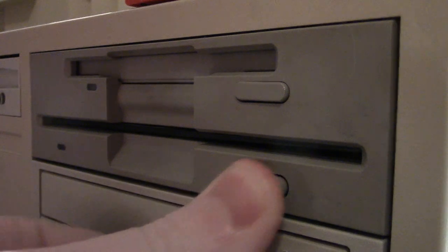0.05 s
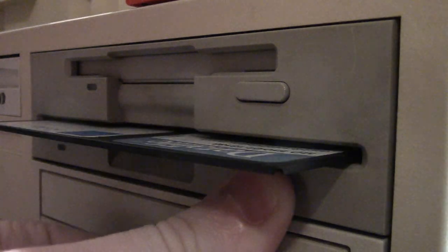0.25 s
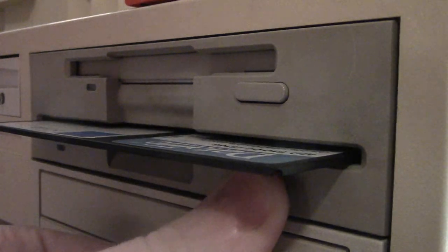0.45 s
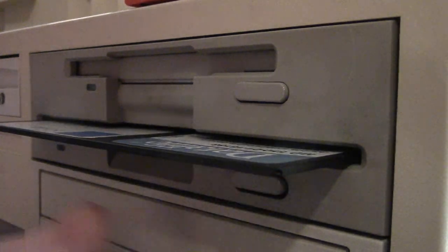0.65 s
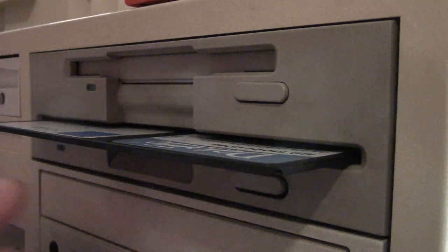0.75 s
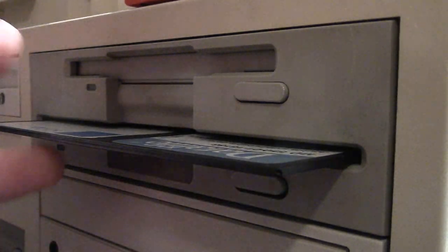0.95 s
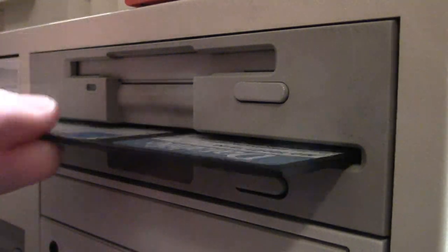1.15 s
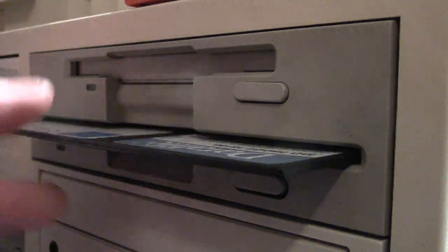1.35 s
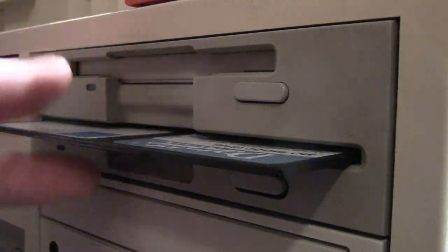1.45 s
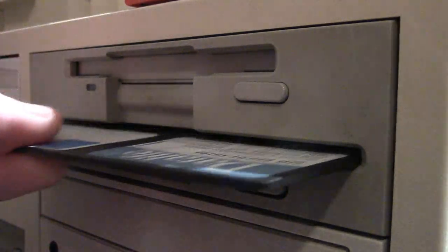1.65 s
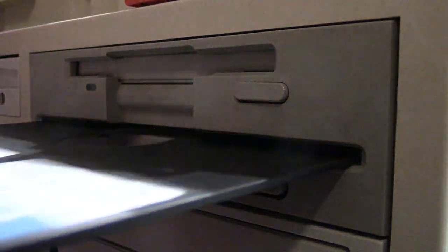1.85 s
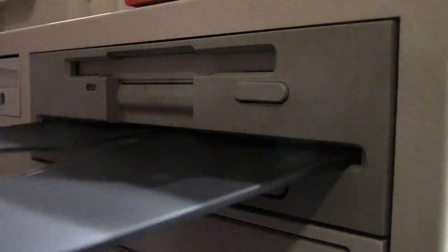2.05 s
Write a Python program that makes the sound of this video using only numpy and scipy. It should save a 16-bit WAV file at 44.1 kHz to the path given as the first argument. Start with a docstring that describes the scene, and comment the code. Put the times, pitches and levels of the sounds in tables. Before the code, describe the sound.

A disk ejects from a computer drive with a sharp double clack, then scrapes out over fan hum

```python
"""A floppy disk is ejected from the drive of a running computer, heard in stereo from close by.
After light plastic ticks the latch lets go with a double clack: noise bursts that ring frame and case.
The spring shimmers as a bank of decaying modes, and the button snaps back with its own ring.
Fingers rub, tick and bump as they take hold; the disk scrapes out along the slot as grainy noise.
Fans run throughout: coloured air noise, wavering tones and a faint diffuse room."""
import sys
import numpy as np
from scipy import signal
from scipy.fft import rfft, irfft
from scipy.io import wavfile
from scipy.ndimage import uniform_filter1d, minimum_filter1d

SR = 44100
rng = np.random.default_rng(int(sys.argv[2]) if len(sys.argv) > 2 else 0)


def transcribe(signal):
    """Save signal, clipped to [-1, 1], as a 16-bit WAV file at the path in sys.argv[1]."""
    frames = np.atleast_2d(signal).T
    limited = np.clip(frames, -1, 1)
    pcm = np.round(limited * 32767).astype(np.int16)
    wavfile.write(sys.argv[1], SR, pcm)


N = 92610
TIME = np.arange(N) / SR

# hard stops that set frame and spring ringing: start_s, level_db
STOPS = [(0.2362, -12), (0.2560, -2.5)]
# ringing of the drive frame: pitch_hz, level_db (added to that of the blow), t60_s
FRAME_MODES = [(533, -23, 0.12), (669, -34, .35), (910, -26, .07), (1513, -30, 0.17), (1840, -29, 0.18),
               (1930, -16, 0.087), (2680, -25, .14), (2954, -20, .08), (3120, -13, 0.063),
               (3155, -13.5, 0.083), (3650, -20.5, 0.056), (3865, -21.5, 0.08)]
# ringing of the case: pitch_hz, level_db (added to that of the blow), t60_s
CASE_MODES = [(188, -26, .22), (243.7, -24, .22), (295, -27, 0.16), (350, -31, .17), (430, -29, .16),
              (883, -29, .2), (955, -30, .27)]
# spectrum of plastic scraping or rubbed by fingers: frequency_hz, relative level_db_per_hz
SCRAPE_SPECTRUM = [(880, -42), (1500, -11.5), (1880, -4.5), (2050, -14), (2240, -6), (2590, -5),
                   (3480, -1.5), (4270, -2), (4940, -1.5), (5720, -9), (7450, -3.5), (10500, -7),
                   (15500, -22.5)]


def from_db(db):
    """Decibels to gain."""
    return 10 ** (np.asarray(db) / 20)


def rms_one(x):
    """Scale to unit power."""
    return x / np.sqrt(np.mean(x ** 2) + 1e-20)


def in_time(rows):
    """Join the rows of a curve by straight lines, one curve for each column after the time."""
    s, *columns = np.transpose(rows)
    return [np.interp(TIME, s, column) for column in columns]


def colour(x, spectrum, tilt_db=0):
    """Give noise a spectrum, tilted in dB per octave, that falls steeply beyond its ends; unit power."""
    hz, db = np.transpose(spectrum)
    octave = np.log2(np.fft.rfftfreq(N, 1 / SR) + 1)
    points = np.log2(hz)
    outside = np.abs(octave - np.clip(octave, points[0], points[-1]))
    tilt = tilt_db * (octave - points.mean())
    shape = np.interp(octave, points, db) + tilt - 18 * outside
    return rms_one(irfft(rfft(x) * from_db(shape), N))


def noise(spectrum, tilt_db=0):
    """Coloured noise of unit power."""
    return colour(rng.standard_normal(N), spectrum, tilt_db)


def drift(rate_hz):
    """Random wandering of unit power, weakening above the given rate."""
    hz = np.fft.rfftfreq(N, 1 / SR)
    return rms_one(irfft(rfft(rng.standard_normal(N)) / (1 + (hz / rate_hz) ** 2), N))


def decay(start_s, t60_s, attack_s):
    """A quick rise at the start time, with an exponential fall."""
    age = np.maximum(TIME - start_s, 0)
    return np.minimum(age / attack_s, 1) * np.exp(-np.log(1000) * age / t60_s)


def knocks(rows, spectrum, attack_s, tail_db, tail_t60_s, tail_tilt_db):
    """Each contact excites a dense, quickly damped cluster of modes, as noise, and leaves a tail."""
    crack, tail_power = np.zeros(N), np.zeros(N)
    for start_s, level_db, tilt_db, t60_s in rows:
        crack += from_db(level_db) * decay(start_s, t60_s, attack_s) * noise(spectrum, tilt_db)
        tail_power += (from_db(level_db) * decay(start_s, tail_t60_s, attack_s)) ** 2
    tail = np.sqrt(tail_power) * noise(spectrum, tail_tilt_db)
    return crack + from_db(tail_db) * tail


def ring(rows, modes):
    """Every blow rings each mode, a two-pole resonator, with a strength of its own."""
    start_s, blow_db = np.transpose(rows)[:2]
    spread_db = 1.5
    out = np.zeros(N)
    for hz, mode_db, t60_s in modes:
        clicks = np.full(N, 1e-18)  # a trace of input keeps the filter out of denormal numbers
        strength_db = blow_db + mode_db + spread_db * rng.standard_normal(len(start_s))
        clicks[(start_s * SR).astype(int)] = from_db(strength_db)
        radius = np.exp(-np.log(1000) / (t60_s * SR))
        angle = 2 * np.pi * hz / SR
        out += signal.lfilter([0, np.sin(angle)], [1, -2 * radius * np.cos(angle), radius ** 2], clicks)
    return out


def eject():
    """The latch lets go and the carriage hits its stops; frame and case ring on."""
    # latch and carriage strike their stops: start_s, level_db, tilt_db_per_octave, t60_s
    blows = [(0.2354, -6.5, 1.5, 0.03), (0.2398, -12, -2, 0.037), (0.2446, -8.5, 1, 0.024),
             (0.2536, -2, 2.5, 0.02), (0.2574, -4.5, 0, 0.032), (0.2604, -6.5, .5, 0.025)]
    # spectrum of the clack: frequency_hz, relative level_db_per_hz
    clack_spectrum = [(125, -29.5), (190, -7.5), (275, -5), (600, -7.5), (900, -2.5), (1100, -10.5),
                      (1350, -4), (1850, -2.5), (2200, -4), (3150, -2.5), (4200, -6), (5700, -13.5),
                      (7400, -6), (10400, -7), (13000, -10), (13600, -18.5), (15500, -25)]
    # the recoil shakes the case: start_s, level_db
    recoils = [(0.2380, -10), (0.2735, 0.5), (0.2890, -10)]
    clack = knocks(blows, clack_spectrum, attack_s=.00067, tail_db=-20, tail_t60_s=.2, tail_tilt_db=-2.5)
    return clack + ring(STOPS, FRAME_MODES) + ring(recoils, CASE_MODES)


def rattle(coil_count=90, touch_count=16):
    """The stops set the spring's close modes shimmering; its coils keep touching, then settle."""
    # ringing of the eject spring: pitch_hz, level_db (added to that of the blow), t60_s
    spring_modes = [(4107, -54, .35), (4678, -52, .35), (5884, -51, .3), (8419, -47, .35), (9792, -50, .35),
                    (10594, -48, 0.4), (10660, -48, .35), (12075, -52, .3)]
    # spectrum of coil chatter and weak coil modes: frequency_hz, relative level_db
    chatter_spectrum = [(4000, -12.5), (6500, -13.5), (8400, 3), (10700, -3.5), (14500, -9.5)]
    lowest_hz, highest_hz = chatter_spectrum[0][0], chatter_spectrum[-1][0]
    pitches = np.linspace(lowest_hz, highest_hz, coil_count) + 50 * rng.standard_normal(coil_count)
    coil_db, spread_db, coil_t60_s = -57, 5, .25
    levels = coil_db + np.interp(pitches, *np.transpose(chatter_spectrum))
    levels = levels + spread_db * rng.uniform(-1, 1, coil_count)
    coil_modes = [(hz, db, coil_t60_s) for hz, db in zip(pitches, levels)]

    start_s, end_s = .27, .435
    touch_db, chatter_db, chatter_t60_s = -16, -37, .07  # touches on the level scale of the stops
    steps = np.cumsum(rng.uniform(.5, 2, size=touch_count))
    touches = [(start_s + share * (end_s - start_s), touch_db) for share in steps / steps[-1]]
    chatter = sum(from_db(db + chatter_db) * decay(s, chatter_t60_s, .001) for s, db in touches)
    return ring(STOPS + touches, spring_modes + coil_modes) + chatter * noise(chatter_spectrum)


def button():
    """The released button springs back, rings and bounces, nudging the case."""
    # the button snaps back: start_s, level_db, tilt_db_per_octave, t60_s
    returns = [(0.5594, -19.5, 0, 0.028), (0.5620, -24, -2, 0.026), (0.5670, -23.5, -3, 0.031),
               (0.5795, -36, -5, .03)]
    # spectrum of the snap: frequency_hz, relative level_db_per_hz
    snap_spectrum = [(900, -13.5), (1600, -11), (1950, 0.5), (2400, -4.5), (2650, -3), (3000, -7.5),
                     (3700, -11), (4250, -15), (4700, -16.5), (6000, -21), (7400, -14), (8600, -21),
                     (11300, -19), (15000, -47)]
    # ringing of the button: pitch_hz, level_db (added to that of the blow), t60_s
    button_modes = [(1660, -13, 0.18), (2290, -8, .045), (4190, -21, 0.059)]
    snap = knocks(returns, snap_spectrum, attack_s=.00075, tail_db=-11.5, tail_t60_s=.1, tail_tilt_db=-2.5)
    nudge = from_db(-2) * ring(returns[:1], CASE_MODES)
    return snap + ring(returns, button_modes) + nudge


def fingers():
    """Soft rubbing and small plastic ticks at button and disk; the gripped disk catches and snaps free."""
    # rubbing of thumb and fingers on button and disk: time_s, level_db
    handling = [(0, -58.5), (0.10, -83), (0.16, -54), (0.23, -49), (0.44, -53.5), (0.5, -63), (1.12, -80.5),
                (1.152, -57), (1.23, -87), (1.265, -53.5), (1.33, -58), (1.42, -57.5), (1.455, -68.5),
                (1.470, -46), (1.478, -47.5), (1.492, -80), (1.69, -73)]
    # light plastic contacts: start_s, level_db, tilt_db_per_octave, t60_s
    tick_rows = [(0.1738, -26, 3, 0.016), (0.1947, -37, 3, 0.014), (0.2152, -33, -2.5, .015),
                 (0.2272, -31, -8, 0.015), (0.6110, -34, 9, 0.013), (0.7625, -46, 2, .025)]
    # spectrum of a tick: frequency_hz, relative level_db_per_hz
    tick_spectrum = [(600, -9), (2000, -4), (3200, -1), (4000, -2), (5000, -6), (6400, -10), (8500, -6),
                     (10500, -5.5), (12000, -16), (15500, -23)]
    # the disk catches in the slot and snaps free: start_s, level_db, tilt_db_per_octave, t60_s
    catch_rows = [(1.6460, -45.5, 3, .01), (1.6505, -32, -1, 0.013)]
    # spectrum of a catch: frequency_hz, relative level_db_per_hz
    catch_spectrum = [(2000, -13), (3400, 4.5), (5400, -1), (6400, -14), (10200, -15), (15000, -25)]
    rub_db, = in_time(handling)
    rub = from_db(rub_db + 1.8 * drift(60)) * noise(SCRAPE_SPECTRUM, tilt_db=-2.3)
    ticks = knocks(tick_rows, tick_spectrum, attack_s=.0006, tail_db=-4, tail_t60_s=.074, tail_tilt_db=-6.5)
    catches = knocks(catch_rows, catch_spectrum, attack_s=.0006, tail_db=-18, tail_t60_s=.05, tail_tilt_db=-1)
    frame = from_db(-4) * ring(tick_rows, FRAME_MODES)
    return rub + ticks + catches + frame


def bumps():
    """Fingers bump the disk and, through it, ring the case."""
    # bumps: start_s, level_db
    bump_rows = [(0.6120, -18), (1.3830, -18.5), (1.4690, -23)]
    return ring(bump_rows, CASE_MODES)


def slide():
    """The jacket scrapes along the slot as hiss, with more low rasp as more of it comes free."""
    # the disk slides out: time_s, hiss_db, rasp_db
    slide_levels = [(1.695, -83, -79), (1.708, -44, -48), (1.755, -38, -43), (1.772, -36, -39),
                    (1.83, -33.5, -43.5), (1.885, -32, -41.5), (1.95, -35.5, -39), (1.985, -35, -35.5),
                    (2.02, -38.5, -37.5), (2.1, -33.5, -37.5)]
    # spectrum of the low rasp: frequency_hz, relative level_db_per_hz
    rasp_spectrum = [(200, -16.5), (500, 1.5), (950, -4.5), (1350, -9), (2000, -14.5), (4000, -10),
                     (6000, -29)]
    hiss_db, rasp_db = in_time(slide_levels)
    hiss = from_db(hiss_db) * colour(friction(), SCRAPE_SPECTRUM)
    rasp = from_db(rasp_db) * colour(friction(), rasp_spectrum)
    grip = from_db(.5 * drift(45))
    return grip * (hiss + rasp)


def friction():
    """Tiny catches of a textured surface, as random clicks, over a smooth hiss."""
    grains_per_s, spread_db, smooth_share = 3000, 3.5, .73
    sizes = from_db(spread_db * np.minimum(rng.exponential(1, N), 4))
    signs = rng.choice([-1, 1], N)
    caught = rng.random(N) < grains_per_s / SR
    return rms_one(sizes * signs * caught) + smooth_share * rng.standard_normal(N)


def thin_out(x):
    """The drive's sounds lose their deep bass: a high-pass at 125 Hz."""
    return signal.sosfilt(signal.butter(3, 125, "high", fs=SR, output="sos"), x)


def fans():
    """Rushing air and slightly wavering fan tones, with a little diffuse room noise."""
    # fan tones: pitch_hz, level_db
    hum = [(302, -37), (604, -50), (673, -49.5), (1210, -53.5)]
    # spectrum of the fan air: frequency_hz, relative level_db_per_hz
    air_spectrum = [(25, -43.5), (65, -30.5), (110, -21.5), (160, -9), (215, -5.5), (250, 0), (310, -4),
                    (380, -12.5), (450, -4.5), (560, -6), (670, -4.5), (830, -15), (1200, -15), (1850, -19),
                    (3900, -32), (6700, -42.5), (15500, -52.5)]
    # spectrum of room noise that differs between the ears: frequency_hz, relative level_db_per_hz
    room_spectrum = [(15, -52), (25, -26.5), (173, -5), (331, -6.5), (2490, -22), (15500, -48)]
    waver_db, waver_hz = 1.2, 1.2
    tones = np.zeros(N)
    for hz, db in hum:
        level = from_db(db + waver_db * drift(3.2))
        phase = 2 * np.pi * np.cumsum(hz + waver_hz * drift(4.8)) / SR
        tones += level * np.sin(phase)
    air = from_db(-39) * noise(air_spectrum)
    balance = from_db([[.25], [-.25]])
    room = from_db(-60) * noise(room_spectrum) * np.array([[1], [-1]])  # opposite sign at each ear
    return (tones + air) * balance + room


def scene():
    """The drive is close and almost straight ahead, with the fans around it."""
    parts = eject() + rattle() + button() + fingers() + bumps()
    drive = thin_out(parts) + slide()
    # adding a little of the slope advances one ear, subtracting it delays the other
    ear_lag_samples = .035
    ear_shift = ear_lag_samples * np.gradient(drive) * np.array([[1], [-1]])
    return drive + ear_shift + fans()


def record(dry):
    """A fast limiter, shared by both microphone channels, holds the loudest peaks; the top is cut."""
    ceiling, limiter_s, cutoff_hz = .86, .002, 15800
    size = int(limiter_s * SR)
    allowed = ceiling / np.maximum(np.abs(dry).max(axis=0), ceiling)
    gain = uniform_filter1d(minimum_filter1d(allowed, size), size)
    top_cut = signal.ellip(10, .1, 80, cutoff_hz, fs=SR, output="sos")
    return signal.sosfilt(top_cut, dry * gain)


dry = scene()
out = record(dry)
transcribe(out)
```